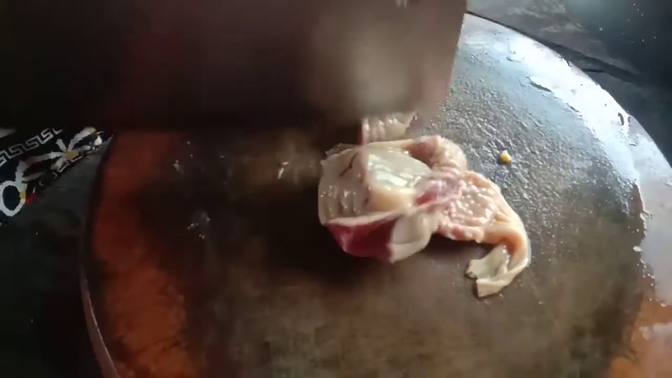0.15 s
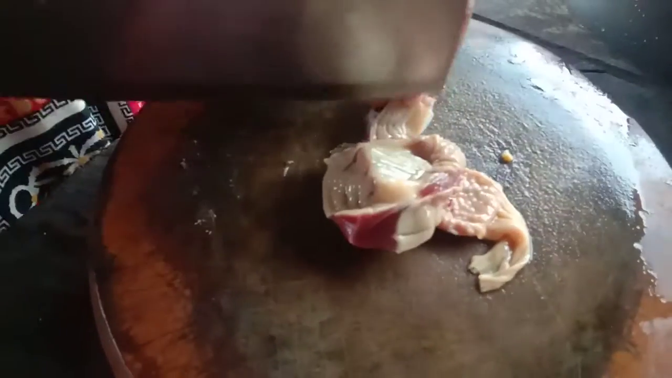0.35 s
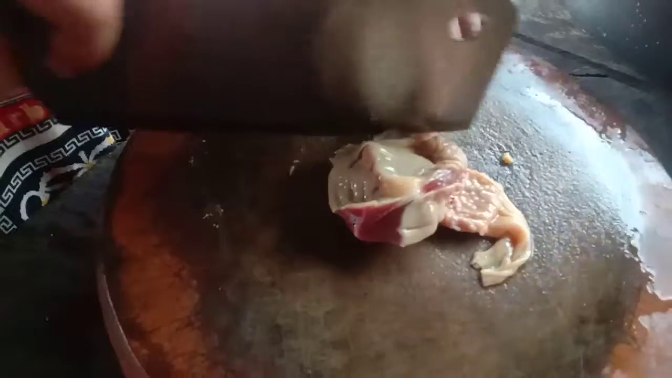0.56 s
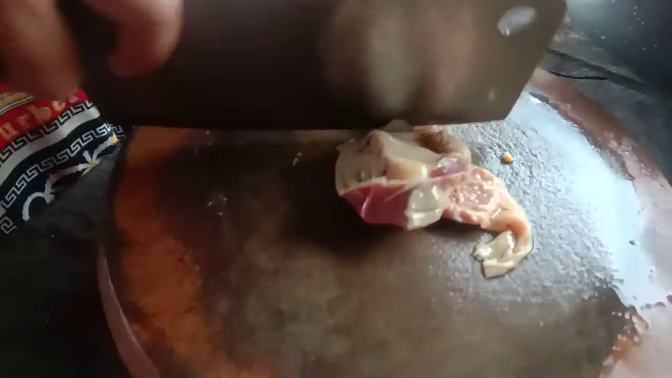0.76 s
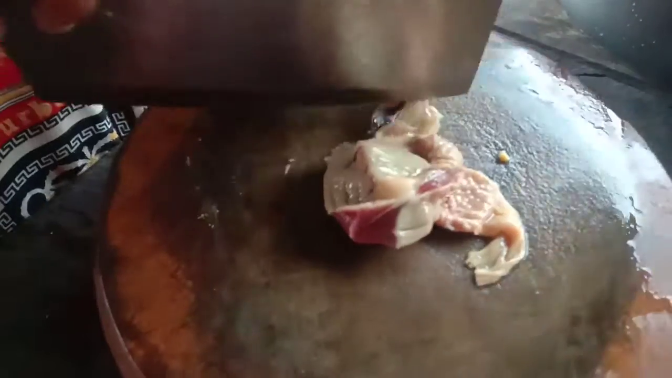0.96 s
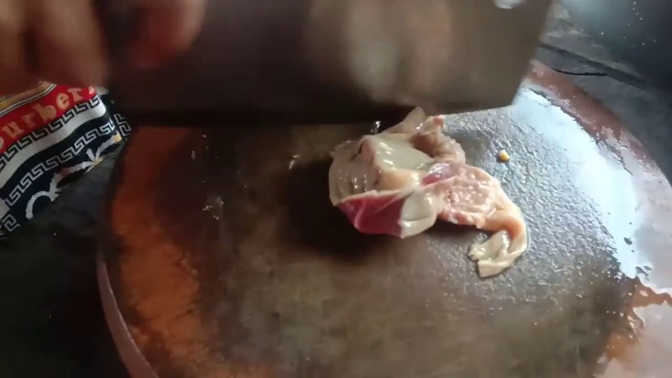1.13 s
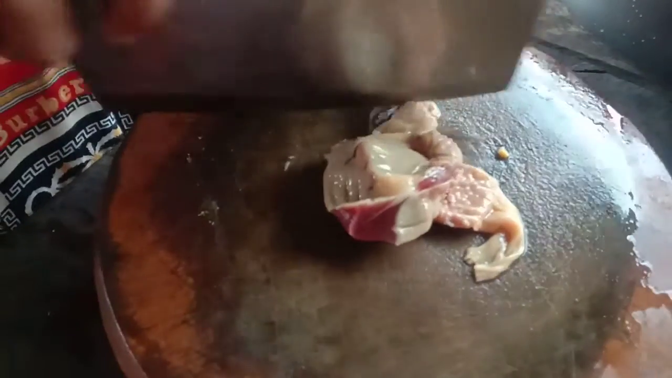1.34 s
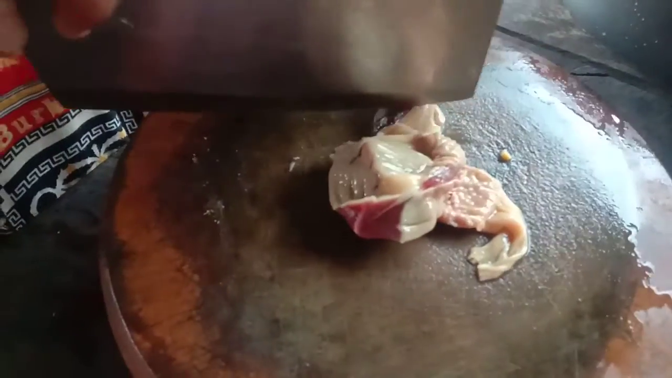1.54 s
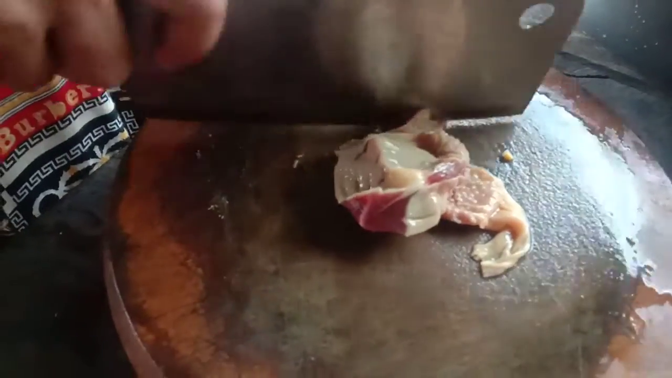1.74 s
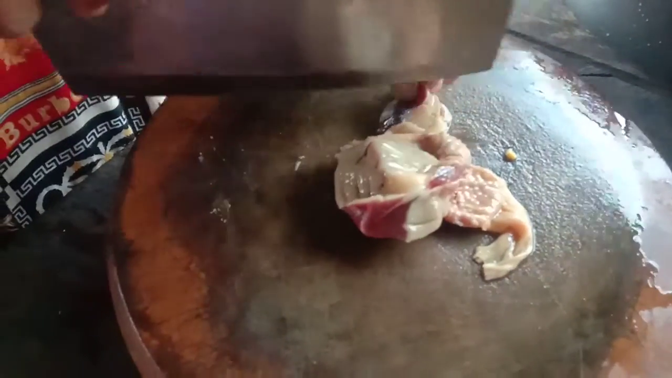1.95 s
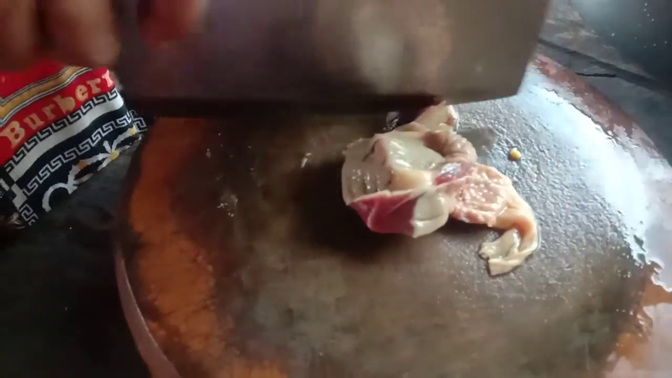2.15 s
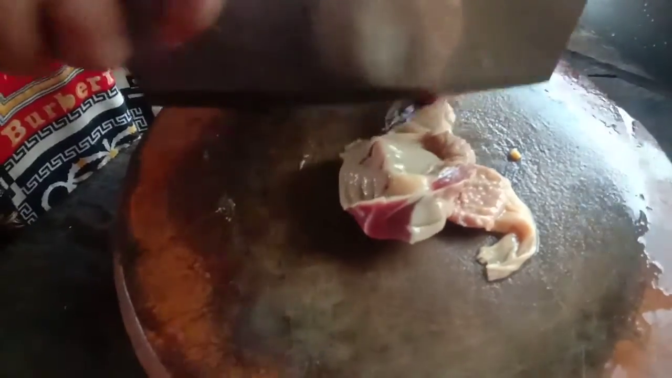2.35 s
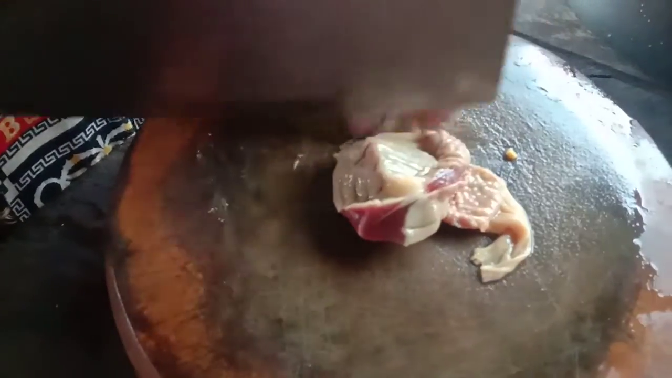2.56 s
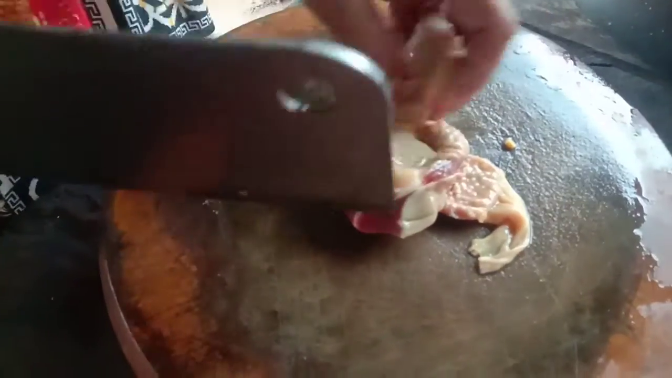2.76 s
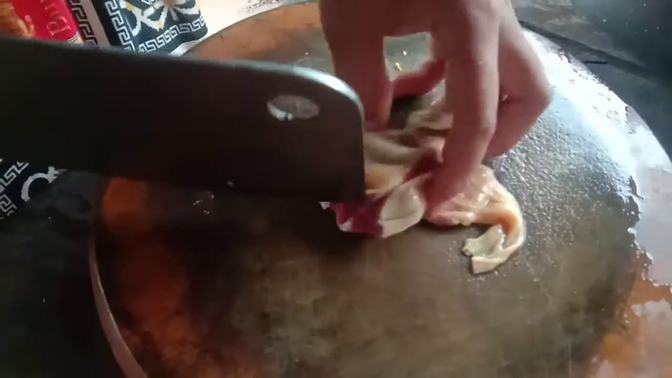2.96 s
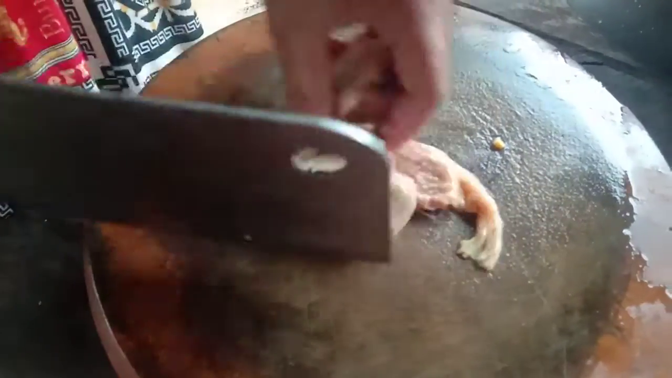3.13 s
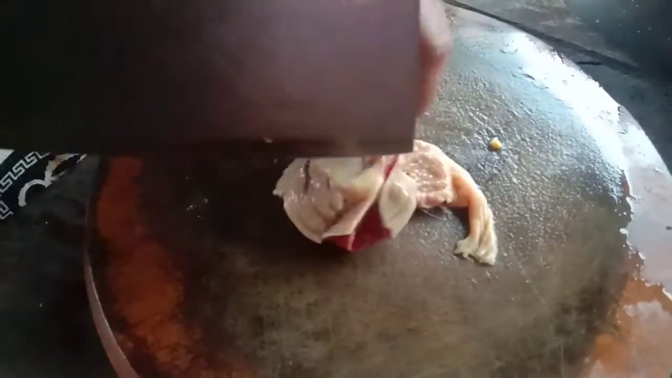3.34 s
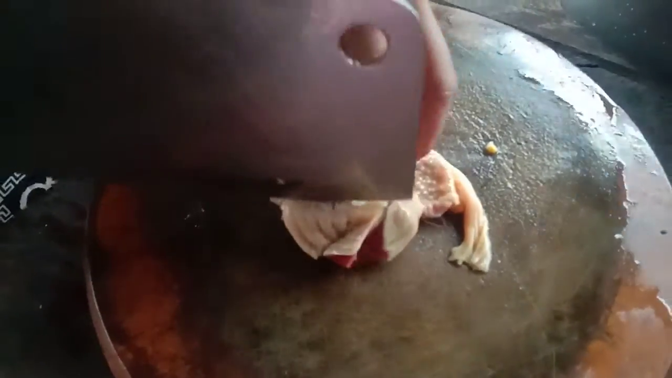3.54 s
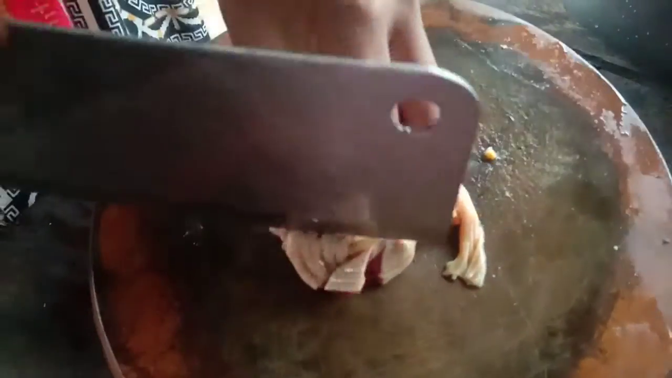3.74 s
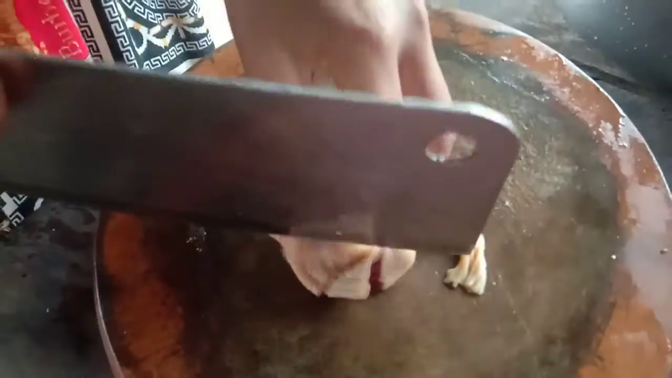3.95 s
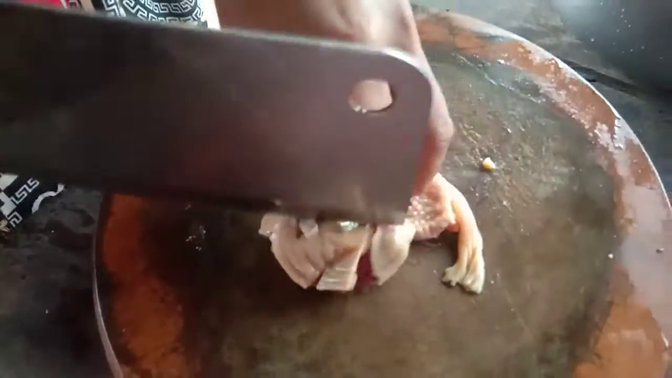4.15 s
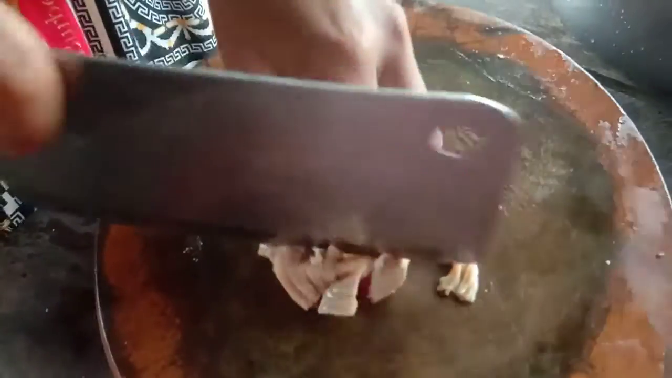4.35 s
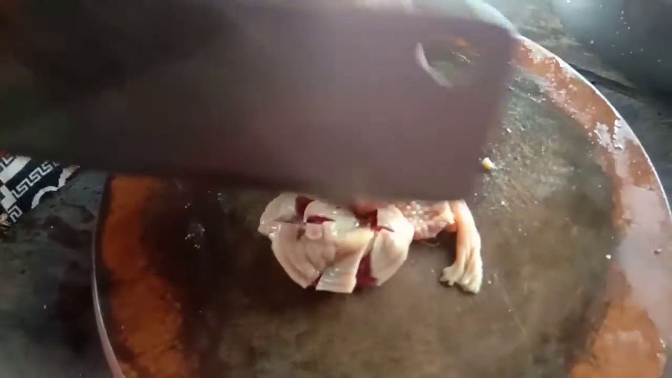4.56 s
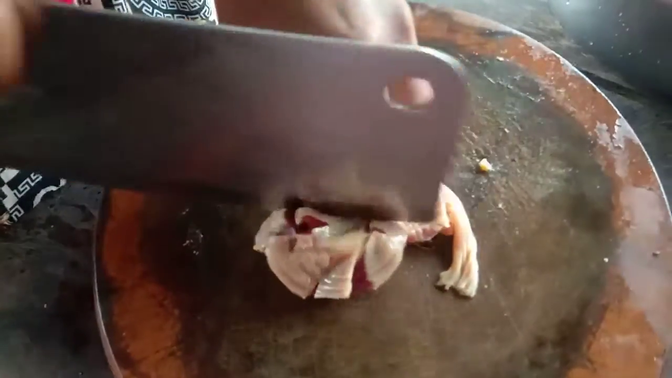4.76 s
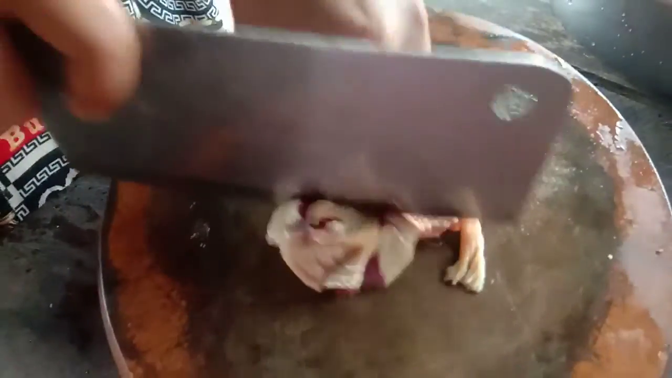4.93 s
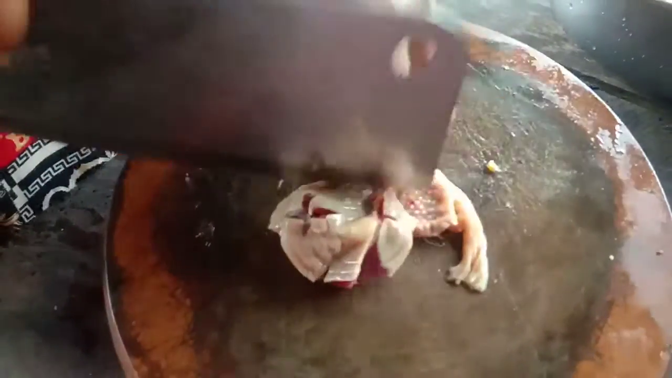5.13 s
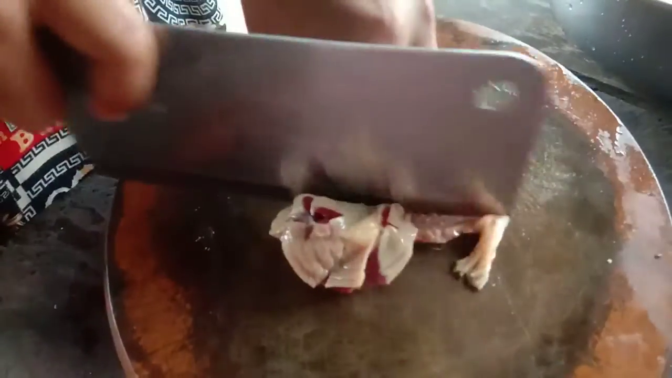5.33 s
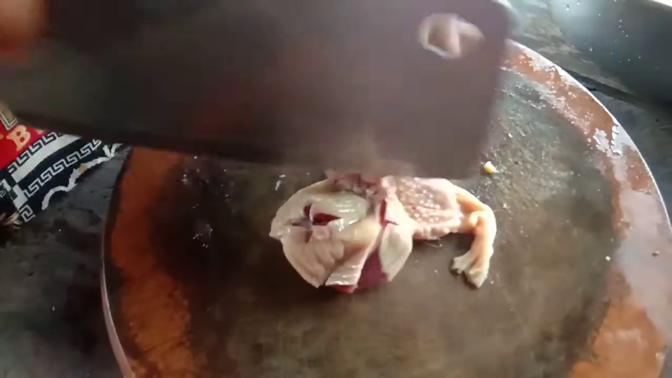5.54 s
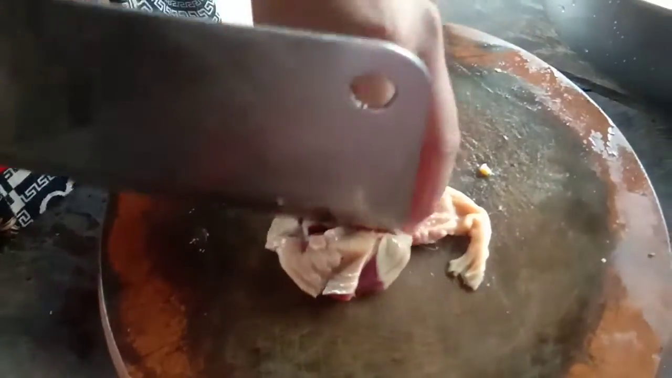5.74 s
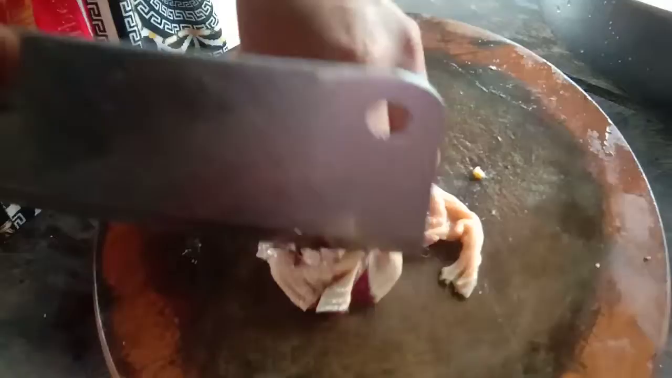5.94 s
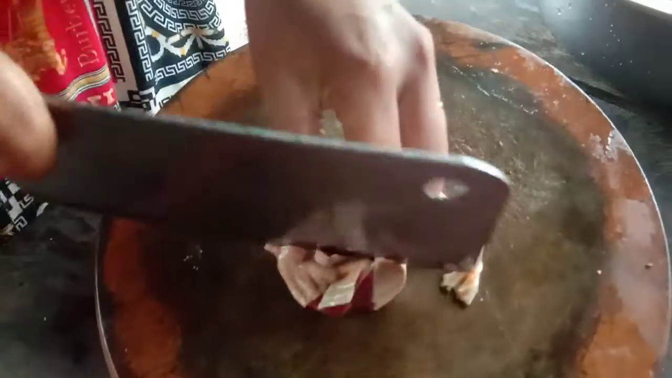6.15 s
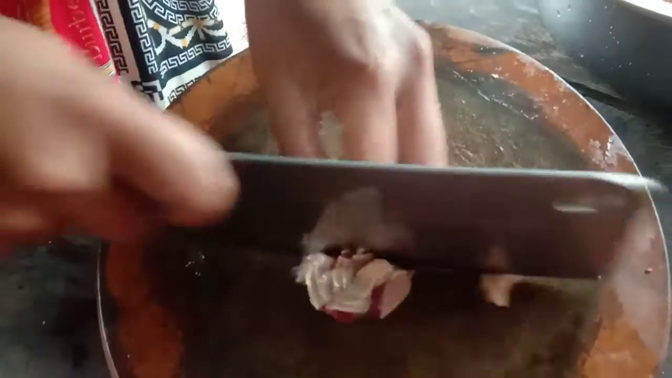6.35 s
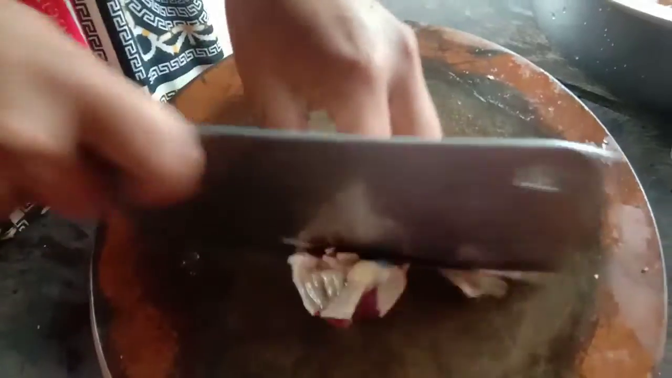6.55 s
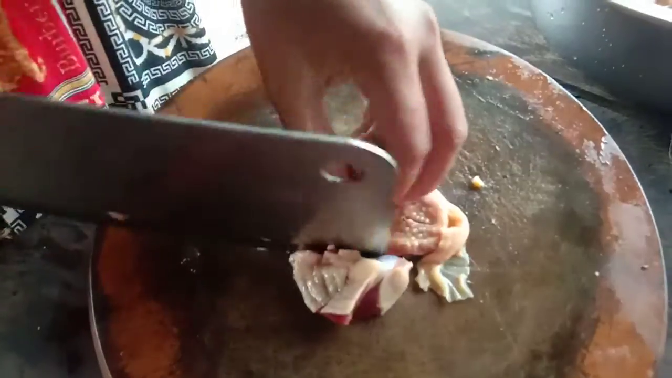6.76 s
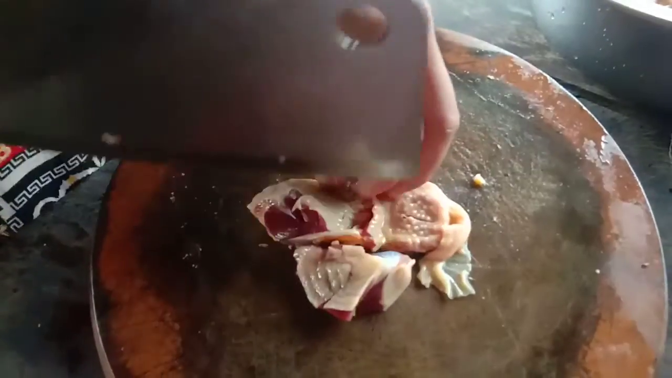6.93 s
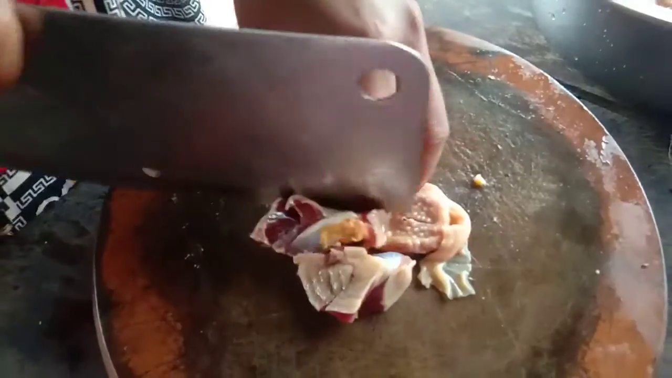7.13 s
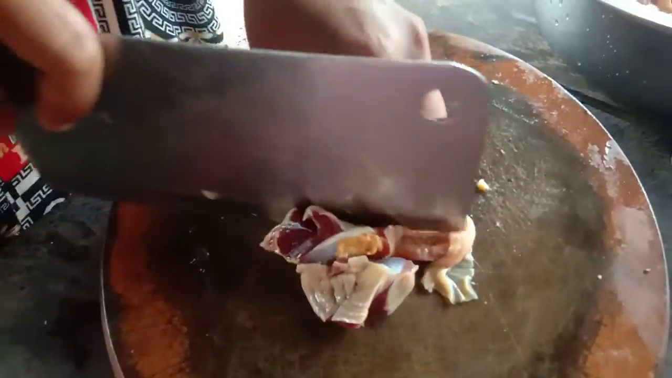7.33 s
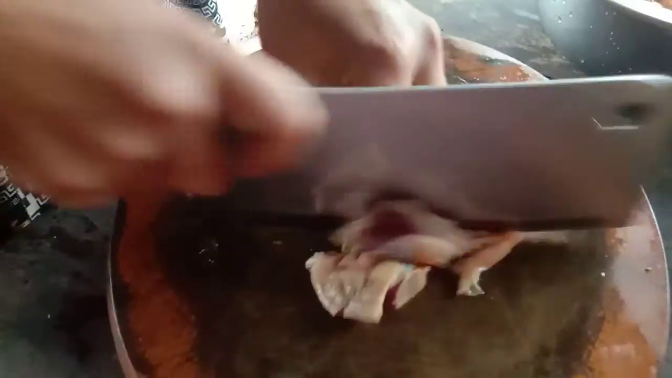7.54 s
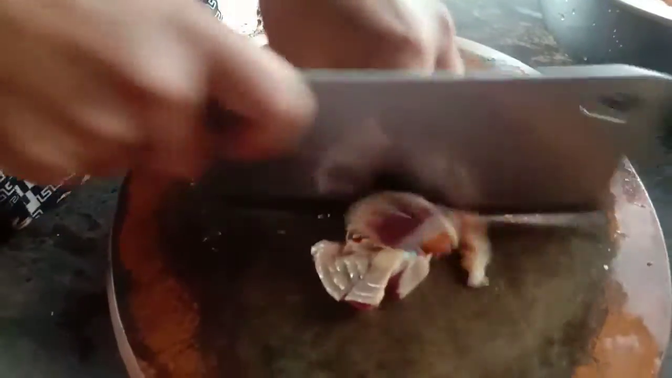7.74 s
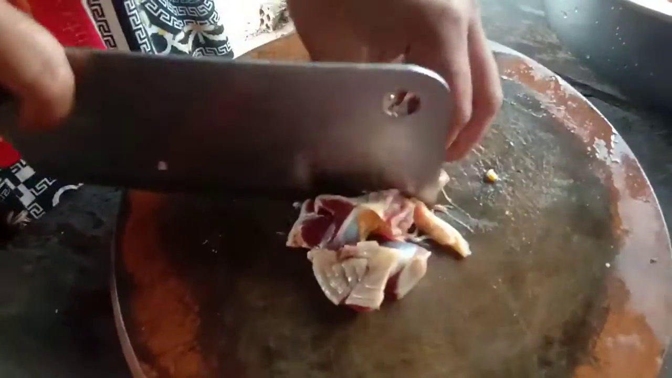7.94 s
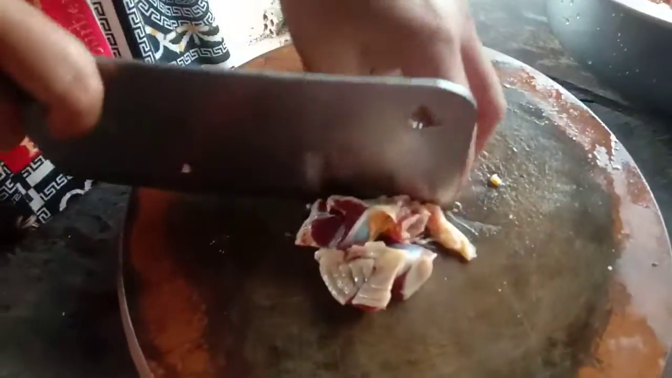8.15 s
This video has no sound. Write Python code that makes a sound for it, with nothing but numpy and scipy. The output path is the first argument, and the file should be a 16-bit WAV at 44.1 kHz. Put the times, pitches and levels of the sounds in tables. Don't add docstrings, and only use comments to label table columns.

```python
import sys
import numpy as np
from scipy import signal
from scipy.fft import rfft, irfft
from scipy.io import wavfile
from scipy.ndimage import uniform_filter1d

SR = 44100
rng = np.random.default_rng(int(sys.argv[2]) if len(sys.argv) > 2 else 0)


def undo_db(level):
    steps = np.asarray(level, float) / 20
    return 10 ** steps


def transcribe(u):
    v = np.clip(np.atleast_2d(u).T, -1, 1)
    q = np.round(v * 32767).astype(np.int16)
    wavfile.write(sys.argv[1], SR, q)


N = 361179
TIME = np.arange(N) / SR
TOP_HZ = 15800
LINE_WOBBLE, LINE_LOST_DB = 0.006, 14


def level(x, db):
    return x * undo_db(db) / np.sqrt(np.mean(x ** 2))


def curve(table):
    s, *columns = np.transpose(table)
    return [np.interp(TIME, s, c, left=c[0], right=c[-1]) for c in columns]


def colour(x, spectrum):
    hz, db = np.transpose(spectrum)
    grid = np.log(np.arange(N // 2 + 1) * SR / N + 1)
    gain_db = np.interp(grid, np.log(hz), db, left=-90, right=-90)
    return irfft(rfft(x) * undo_db(gain_db), N)


def ring(x, hz, width):
    return signal.lfilter(*signal.iirpeak(min(hz, 0.45 * SR), hz / max(width, 1), fs=SR), x)


def body(x, modes):
    return sum((-1) ** k * undo_db(db) * ring(x, hz, width) for k, (hz, width, db) in enumerate(modes))


def band(x, low, high):
    return signal.sosfilt(signal.butter(4, [low, high], "band", fs=SR, output="sos"), x)


def walk(count):
    k = int(SR / count)
    steps = np.repeat(rng.standard_normal(N // k + 1), k)
    return 1.265 * uniform_filter1d(uniform_filter1d(steps, k), k)[:N]


def add(out, start_s, x):
    i = int(start_s * SR)
    out[i:i + len(x)] += x[:N - i]


def chorus():
    # frequency in Hz, density in dB per Hz
    chorus_colour = [(2940, -31.5), (4850, -11), (5360, -12.5), (5870, -6.5), (6240, 5), (6720, 7),
                     (7040, 7.5), (7600, -3.5), (8060, -64), (8460, -67), (9000, -34), (11700, -35),
                     (19800, -120)]
    # time in seconds, chorus level in dB
    chorus_swell = [(0.0, -52), (0.27, -52.5), (2.23, -50.5), (2.46, -52.5), (2.96, -51.5), (6.25, -52),
                    (6.45, -51.5), (6.8, -52.5), (7.05, -51), (7.53, -49), (7.85, -53.5), (8.19, -50.5)]
    # time in seconds, gain of the lower kind in dB
    lower_swell = [(0, -2.5), (.5, -2), (1, -1), (1.5, 6.5), (2.3, -1), (2.8, -5), (3.3, -6), (3.8, 1),
                   (4.4, 3), (5, 4), (5.6, 1.5), (6.4, 6), (7, 3.5), (7.3, 3), (7.9, -2.5), (8.19, 0)]
    buzz = colour(undo_db(walk(300)) * rng.standard_normal(N), chorus_colour)
    buzz = level(buzz, -50.47)
    lower = colour(buzz, [(2500, 0), (5690, 0), (5710, -90)])
    (lower_db,) = curve(lower_swell)
    patchy = sum(undo_db(lower_db + 5.7 * walk(4.5)) * band(lower, hz, hz + 400) for hz in range(2500, 5700, 400))
    (swell_db,) = curve(chorus_swell)
    return undo_db(swell_db - swell_db.mean() + 1.1 * walk(5.8)) * (buzz - lower) + patchy


def engine():
    # time in seconds, firing rate in Hz
    firing_rate = [(0, 19.15), (.79, 19.6), (1.41, 19.6), (1.82, 19.9), (2.18, 19.9), (3.45, 20.6),
                   (4.06, 20.6), (4.65, 20.4), (4.94, 21.1), (5.27, 20.2), (5.51, 20.3), (5.8, 19.3),
                   (6.3, 18.7), (6.9, 18.1), (7.3, 17.7), (8.19, 17.2)]
    # time in seconds, exhaust level in dB
    exhaust_level = [(0.0, -56), (0.34, -53.5), (0.66, -57), (1.76, -52), (2.92, -50.5), (3.58, -58),
                     (4.22, -60.5), (5.68, -54), (5.93, -58), (6.87, -57.5), (7.25, -65.5), (7.53, -64.5),
                     (7.82, -64), (8.19, -60.5)]
    # centre in Hz, width in Hz, gain in dB
    exhaust_modes = [(81, 14, -8.5), (97, 29.2, 3), (116.7, 31.5, 6), (139.8, 9, 1.5), (245, 24, -23)]
    # time in seconds, level in dB
    casing_level = [(0, -85), (.65, -69), (.95, -80.5), (2.8, -79.5), (3.15, -65.5), (3.95, -66),
                    (4.3, -71.5), (4.8, -76), (4.95, -67), (5.1, -80), (5.3, -65.5), (5.5, -76.5),
                    (5.75, -63.5), (5.95, -86), (8.19, -81)]
    (hz,), (exhaust_db,), (casing_db,) = curve(firing_rate), curve(exhaust_level), curve(casing_level)
    slowed_hz = np.maximum(19.4 - hz, 0)
    uneven = 0.24 + 0.22 * slowed_hz
    cycle = np.floor(np.cumsum(hz * (1 + 0.037 * uneven * walk(21))) / SR + 0.49).astype(int)
    size_db = 6 * uneven * rng.standard_normal(N // 1000)[cycle]
    firing = np.diff(cycle, prepend=cycle[0]) * undo_db(size_db)
    exhaust = band(body(firing, exhaust_modes), 70, 280) * undo_db(-9.0 * slowed_hz)
    knock = level(band(firing, 170, 318), -28.5)
    hum = ring(ring(firing, 326.0, 21), 328, 35)
    hum_db = casing_db + 0.83 * walk(3.23)
    thump = band(ring(firing + 0.008 * rng.standard_normal(N), 90, 45), 62, 150)
    thump_db = -8.5 + 11 * np.clip(19.97 - hz, 0, 1.2) * (TIME > 5.0)
    puffs = level(exhaust, 0.88) + knock + level(thump, 0) * undo_db(thump_db)
    return undo_db(exhaust_db) * puffs + undo_db(hum_db) * level(hum, 0)


def yard():
    # frequency in Hz, density in dB per Hz
    rustle_colour = [(88, 1), (150, 0.5), (194, -9), (287, -9), (540, -19.5), (1080, -19.5), (1260, -16.5),
                     (1400, -21.5), (1620, -18), (2590, -16), (3660, -17.5), (5500, -37), (7150, -68),
                     (12100, -120)]
    top_colour = [(4710, -27), (8000, -2), (8090, -13), (8840, -28), (10500, -2.5), (11900, -19.5),
                  (13500, -16), (15300, -9), (16000, -11), (16200, -21)]
    low = colour(rng.standard_normal(N), rustle_colour)
    low = low * undo_db(-71) / np.std(band(low, 610, 3100))
    swell = walk(2.085)
    edges_hz = 140 * 1.4 ** np.arange(13)
    low = sum(undo_db(swell + 2.74 * walk(5) + 2.7 * walk(25)) * band(low, a, b)
              for a, b in zip(edges_hz, edges_hz[1:]))
    top = colour(undo_db(0.48 * walk(3.5)) * rng.standard_normal(N), top_colour)
    hollow = ring(ring(rng.standard_normal(N), 1250, 100), 1248, 110)
    return low + level(top, -74) + undo_db(5.6 * walk(9)) * level(hollow, -75.0)


def rumble():
    return level(band(rng.standard_normal(N), 15, 48) * undo_db(3.4 * walk(3)), -80.5)


def ticks():
    # start in seconds, peak in dB, ring in Hz, bare crack in dB
    edge_ticks = [(0.022, -45, 6300, -32), (0.1457, -55, 6550, -30), (0.713, -50, 6760, -21),
                  (1.1832, -28, 6000, -39), (1.202, -43, 1200, -45), (1.5683, -36, 6930, -15),
                  (1.576, -36, 14800, -17), (1.583, -21.5, 6160, -23), (1.586, -30, 1320, -29),
                  (1.716, -26.5, 6140, -30), (1.7182, -25, 6300, -36), (1.721, -31, 5000, -38),
                  (2.5094, -34, 6040, -22), (2.528, -30, 2400, -42), (2.9438, -45, 2050, -45),
                  (4.2368, -30, 6000, -23), (4.7604, -27, 5800, -34), (4.7903, -24, 6000, -32),
                  (4.889, -42, 15000, -14), (4.8934, -36.5, 1860, -26), (4.9192, -35, 6900, -38),
                  (5.1202, -33, 6600, -38), (5.125, -32, 5540, -40), (6.116, -39, 6000, -25),
                  (6.202, -36, 11500, -20), (6.295, -25, 6000, -26), (6.299, -29.5, 12100, -14),
                  (6.396, -33, 5570, -35), (6.4874, -20, 5670, -30), (6.555, -19, 6000, -34),
                  (6.8064, -40, 2750, -34), (6.9636, -46, 3500, -18), (7.375, -51, 11130, -10),
                  (7.425, -43, 11000, -10), (7.4343, -30, 4520, -34), (7.4713, -14.5, 6800, -11),
                  (7.4745, -11.5, 6200, -16), (7.6385, -28, 5500, -39), (7.766, -37, 2970, -40),
                  (7.99, -38, 1240, -42), (8.1555, -36, 6860, -30), (7.4745, -30, 15000, -25),
                  (7.462, -25, 5500, -25), (1.717, -37.5, 2050, -40), (6.5575, -20, 6500, -31),
                  (1.26, -36, 5750, -30), (6.1215, -38, 4800, -40), (1.728, -45, 9500, -25)]
    # start in seconds, peak in dB
    thuds = [
        (1.582, -39.5),
        (2.511, -45),
        (2.53, -48),
        (6.271, -50),
        (6.299, -46),
        (6.489, -56),
        (7.441, -64),
    ]
    # centre in Hz, width in Hz, gain in dB
    board_modes = [(97.6, 10.8, 4.5), (253, 150, -7), (490, 560, -15), (904, 53, -10)]
    # start in seconds, peak in dB, pitch in Hz
    knocks = [(5.575, -71, 625), (5.945, -68, 847), (6.02, -72, 700), (6.06, -68, 696), (6.618, -61, 433),
              (7.177, -72, 495)]
    out, push, t = np.zeros(N), np.zeros(N), TIME[:4000]
    shape = (1 - np.exp(-t / 0.0002)) * np.exp(-t / 0.0016)
    for s, db, hz, bare_db in edge_ticks:
        crack = band(rng.standard_normal(len(t)), 1060, 15700) * shape
        rung = band(ring(crack, hz, 0.35 * hz), 0.6 * hz, min(1.5 * hz, TOP_HZ))
        crack = rung + undo_db(bare_db + 3) * crack
        add(out, s, undo_db(db) * crack / np.abs(crack).max())
    for s, db in thuds:
        add(push, s, undo_db(db + 23.0) * np.exp(-t / 0.0009))
    for s, db, hz in knocks:
        swell = t / 0.0031 * np.exp(1 - t / 0.014) / 1.35
        tone = np.sin(2 * np.pi * hz * t) * np.cos(2 * np.pi * 22 * t)
        add(out, s, undo_db(db) * swell * tone)
    return out + body(push, board_modes)


def touches(table, voice, rounded):
    power = np.zeros((len(voice) + 1, N))
    offset_db, share, lost_db = np.transpose(voice)
    for s, db, rise_s, fall_s, extra_db in table:
        span = slice(max(int((s - 2 * rise_s) * SR), 0), int((s + 2 * fall_s) * SR))
        late = TIME[span] - s
        away = np.where(late < 0, -late / rise_s, late / fall_s) ** rounded
        bands_db = (db + offset_db + share * extra_db)[:, None] - lost_db[:, None] * away
        board_db = 1.26 * ((bands_db[0] + bands_db[1]) / 2 + 41.5) - 48.5
        power[:, span] += undo_db(2 * np.vstack([board_db, bands_db]))
    return power


def slicing():
    # low edge in Hz, high edge in Hz
    slice_bands = [(250, 1030), (1030, 1470), (1470, 4300), (4300, 8300), (8300, 16000)]
    # frequency in Hz, density in dB per Hz
    slice_colour = [(120, -64), (200, -41), (500, -18), (722, -18.5), (1230, -9.5), (1770, -9.5),
                    (2860, -11.5), (3620, -13), (5940, -3.5), (8900, -27), (13000, -31), (14600, -29),
                    (16000, -20)]
    # centre in Hz, width in Hz, gain in dB
    blade_modes = [(467, 44, -1.5), (630, 300, -13.5), (1240, 33, 14), (1596, 11, -10), (2050, 190, -18),
                   (2700, 91, 1), (2930, 62, -8.5), (3320, 410, -4.5), (4084, 230, -4.5), (4920, 180, -6),
                   (5500, 150, 0), (5900, 340, -6), (6140, 720, -0.5), (6760, 340, 4.5), (7280, 170, 2.5),
                   (10800, 57, -7),
                   (7830, 65, 3), (8400, 63, -3.5), (8940, 62, 0), (9610, 130, 0.5), (10445, 125, -0.5),
                 (11000, 49, 3), (11230, 81, 1), (11900, 40, -2), (12000, 87, 0), (13300, 55, -3),
                 (13350, 120, -4), (14000, 100, -3), (14400, 85, -1), (15050, 104, 3)]
    # peak in seconds, edge hiss in dB, rise in seconds, fall in seconds, weight on the blade in dB
    draws = [(0.535, -51, 0.09, 0.1, -4.5), (1.03, -48.5, 0.055, 0.071, -10),
             (1.095, -50, 0.097, 0.078, -3), (1.583, -49.5, 0.07, 0.093, -5.5),
             (2.07, -47, 0.015, 0.2, -2.5), (4.255, -55.5, 0.12, 0.12, 3.5),
             (4.762, -42.5, 0.098, 0.094, -6), (5.285, -56, 0.13, 0.077, 0.5), (6.12, -67, 0.49, 0.21, 0),
             (6.203, -42, 0.012, 0.17, -7.5), (6.275, -37.5, 0.018, 0.015, -6), (6.31, -46, 0.086, 0.11, 1),
             (6.462, -50, 0.012, 0.049, -1), (6.489, -38, 0.014, 0.045, -1),
             (6.55, -39.5, 0.084, 0.14, 0.5), (6.62, -48, 0.11, 0.12, 3.5), (7.38, -56, 0.23, 0.3, 2),
             (7.437, -46.5, 0.008, .09, 0), (7.475, -42, 0.039, 0.037, 4), (7.5, -51, 0.062, 0.1, 7),
             (7.648, -52.5, 0.025, 0.035, 7), (7.79, -64, 0.22, 0.11, 10)]
    # peak in seconds, blade in dB, rise in seconds, fall in seconds, ring of the lowest mode in dB
    presses = [(0.8, -67, 0.094, 0.047, 4), (1.208, -52, 0.018, 0.02, 5), (1.265, -44.5, 0.12, 0.19, -6.5),
               (1.45, -55, 0.17, 0.053, -4), (1.716, -46.5, 0.0062, 0.067, -26),
               (2.512, -35, 0.0041, 0.087, -8), (2.545, -44.5, 0.032, 0.15, 1),
               (2.95, -55.5, 0.026, 0.087, -18), (3.17, -63, 0.55, 0.14, -1),
               (3.44, -56.5, 0.063, .1, -3.5), (3.81, -60, 0.48, 0.2, -12), (5.803, -53, 0.012, 0.34, -6),
               (6.345, -44.5, 0.071, 0.056, 2.5), (6.458, -41, 0.006, 0.019, -4), (6.87, -71, .05, .08, -4),
               (6.81, -50.5, 0.01, 0.22, -12), (6.99, -56, 0.057, 0.1, -19), (7.437, -57, 0.0036, .05, -5),
               (7.993, -51, 0.066, 0.03, -2)]
    # offset in dB, share of the touch's last column, dB lost over rise and fall
    draw_voice = [(-3.5, 1.1, 19.5), (1.5, 1.04, 22.5), (7, 0.9, 20.5), (2.5, 0.31, 24.5)]
    press_voice = [(1, 1.2, 26), (0, 0.11, 23.6), (0.5, 0.11, 58), (-14.5, 0.13, 92)]
    sizes_db = 3.8 * np.minimum(rng.exponential(size=N), 4)
    snaps = (rng.random(N) < 2500 / SR) * undo_db(sizes_db) * rng.choice([-1, 1], N)
    friction = undo_db(1.13 * walk(90)) * (level(snaps, -7.0) + level(rng.standard_normal(N), -0.67))
    modes = sum(ring(friction * undo_db(db + 6 * walk(28)), hz, width) for hz, width, db in blade_modes)
    sound = colour(friction + undo_db(9) * modes, slice_colour)
    gains = np.sqrt(touches(draws, draw_voice, 1.54) + touches(presses, press_voice, 1.06))
    out = []
    for gain, edges_hz in zip(gains, slice_bands):
        part = band(sound, *edges_hz)
        out.append(gain * part / np.sqrt(uniform_filter1d(part ** 2, size=2000) + 1e-12))
    return out


def bitten(slices):
    catch_db = [1.5, 2.5, 2, 1.5, 1.5]
    bite = walk(160)
    return sum(part * undo_db(db * (walk(110) + bite) / 1.4 - db / 4) for part, db in zip(slices, catch_db))


def squeals():
    # peak in seconds, first pitch in Hz, last pitch in Hz, level in dB, half length in seconds
    slides = [(.54, 5650, 6250, -41, .035), (0.502, 4150, 4100, -58, 0.033), (.53, 1330, 1360, -53, 0.022),
              (6.14, 3600, 3900, -56, .09), (5.85, 2300, 2800, -61, .05), (6.55, 5500, 6150, -32, 0.038),
              (6.6, 4000, 4900, -40, .04), (6.51, 2200, 2400, -50, 0.034), (6.215, 2730, 3000, -51, .025)]
    out, wobble, flutter = np.zeros(N), walk(300), undo_db(4 * walk(150))
    for s, first_hz, last_hz, db, half_s in slides:
        span = slice(int((s - 2 * half_s) * SR), int((s + 2 * half_s) * SR))
        away = (TIME[span] - s) / half_s
        hz = first_hz + (last_hz - first_hz) * np.clip((1 + away) / 2, 0, 1)
        phase = 2 * np.pi * np.cumsum(hz * (1 + 3 * LINE_WOBBLE * wobble[span])) / SR
        out[span] += undo_db(db - LINE_LOST_DB * away ** 2) * flutter[span] * np.sin(phase)
    return out


def singing():
    # peak in seconds, pitch in Hz, level in dB, rise in seconds, fall in seconds
    sung_modes = [(.545, 1320, -55, .04, 0.05), (.54, 6140, -51, 0.035, .03), (1.11, 1320, -55, .08, .05),
                  (1.595, 1333, -44, 0.0065, 0.016), (2.52, 2507, -40, 0.0089, 0.03),
                  (2.52, 6050, -40.5, 0.0084, 0.024), (2.55, 1220, -52, 0.015, 0.087),
                  (4.27, 3060, -51, 0.026, .03), (4.31, 3540, -53, .02, 0.038),
                  (4.22, 2760, -58, 0.039, .03), (4.76, 2700, -51, 0.017, 0.027),
                  (6.21, 5600, -46, .015, .03), (6.275, 6400, -39, .015, 0.016),
                  (6.295, 5900, -47, 0.009, 0.013), (6.33, 1222, -40, 0.026, 0.07),
                  (6.33, 5530, -43, .03, .04), (6.345, 2600, -45, 0.032, 0.042),
                  (6.455, 1233, -37, 0.0056, 0.013), (6.465, 5540, -40, .01, .015),
                  (6.465, 2720, -48, 0.0086, 0.016), (6.49, 5540, -32, .012, .03),
                  (6.5, 1190, -40.5, 0.019, 0.036), (6.53, 5400, -35, .03, .025),
                  (6.53, 4010, -46, .02, .02), (6.56, 6030, -33, .04, 0.02),
                  (6.562, 6800, -35.5, 0.025, 0.037), (6.565, 2930, -37, 0.033, 0.043),
                  (6.6, 1960, -46, 0.035, 0.032), (6.62, 5390, -41, .03, .03), (6.65, 6800, -47, .03, .03),
                  (6.675, 6040, -42, .02, .03), (6.81, 2730, -48, 0.0048, 0.011),
                  (7.45, 4643, -41, 0.023, .03), (7.48, 1664, -44, 0.017, 0.041),
                  (7.51, 1144, -45.5, 0.025, 0.06), (7.645, 1160, -45.5, 0.011, 0.018),
                  (7.65, 4570, -37, 0.011, 0.01), (7.65, 5580, -40.5, 0.014, .015),
                  (7.77, 2850, -54, 0.013, 0.024), (7.992, 3530, -52, .01, 0.0088)]
    out, wobble, flutter_db = np.zeros(N), walk(250), 3 * walk(120)
    late = TIME[:13000] - 0.12
    for k, (s, hz, db, rise_s, fall_s) in enumerate(sung_modes):
        away = np.where(late < 0, late / rise_s, late / fall_s) ** 2
        chance = slice(8000 * k, 8000 * k + len(late))
        phase = 2 * np.pi * np.cumsum(hz * (1 + LINE_WOBBLE * wobble[chance])) / SR
        add(out, s - 0.12, undo_db(db - LINE_LOST_DB * away + flutter_db[chance]) * np.sin(phase))
    return out


def shoves():
    # peak in seconds, level in dB, half length in seconds, centre in Hz
    squelches = [(2.545, -49, 0.081, 1740), (2.63, -58.5, 0.073, 2500), (2.561, -62, 0.066, 430),
                 (4.24, -63, 0.04, 610), (6.25, -55, 0.05, 590), (6.55, -57, 0.057, 490),
                 (6.62, -63, 0.046, 2500), (6.83, -62, 0.096, 770), (6.86, -59, 0.056, 470),
                 (4.27, -50, 0.074, 3540), (4.893, -56, 0.008, 3600), (0.63, -70, 0.042, 2800),
                 (1.56, -63, .03, 2440), (6.861, -59.5, .07, 3300), (6.2, -58, 0.033, 2000),
                 (7.44, -62, 0.068, 330), (7.47, -53, 0.086, 930), (7.819, -57, 0.042, 1220),
                 (7.8, -53, .03, 5400), (1.275, -55, 0.056, 2060), (1.442, -59.5, 0.043, 1560),
                 (5.85, -58, 0.06, 2260), (6.349, -56, 0.037, 2300)]
    out, t = np.zeros(N), TIME[:18000] - 0.2
    lumps = undo_db(4.1 * walk(70))
    for k, (s, db, half_s, hz) in enumerate(squelches):
        wet = band(rng.standard_normal(len(t)), hz / 1.3, hz * 1.3)
        wet = wet * lumps[14000 * k:14000 * k + len(t)]
        swell = np.exp(-(t / np.where(t < 0, 0.4 * half_s, half_s)) ** 2)
        add(out, s - 0.2, level(wet, db) * swell)
    return out


def cicada():
    # start in seconds, level in dB
    phrases = [(1.694, -43.5), (1.925, -44), (2.154, -43.5), (2.384, -44.5), (2.613, -44.5), (2.876, -45),
               (3.104, -45), (3.374, -46), (5.847, -42.5), (6.08, -43), (6.303, -45), (6.56, -46)]
    syllables_db = [-4, -0.5, -2, -9.5, -44, -52]
    clicks_db = [-4, -3, 0]
    syllable_s = 0.0387
    gate, t = np.zeros(N), TIME[:700]
    buckle = (t / 0.0085) * np.exp(1 - (t / 0.0085) ** 4)
    for start_s, db in phrases:
        for k, syllable_db in enumerate(syllables_db):
            for j, click_db in enumerate(clicks_db):
                late, size = rng.standard_normal(2)
                when_s = start_s + syllable_s * (k + j / len(clicks_db)) + 0.00065 * late
                add(gate, when_s, undo_db(db + syllable_db + click_db + 0.8 * size) * buckle)
    phase = 2 * np.pi * np.cumsum(4730 * (1 + 0.036 * walk(600))) / SR
    ribs = np.sin(phase) * undo_db(0.9 * walk(250))
    call = undo_db(6.0) * ring(gate * ribs, 4700, 570)
    tail = rng.standard_normal(6000) * np.exp(-TIME[:6000] / 0.098)
    return call + undo_db(-37) * signal.fftconvolve(call, tail)[:N]


def roosters():
    # start in seconds, length in seconds, first pitch in Hz, held pitch in Hz, glide in seconds,
    # level in dB
    crows = [
        (3.282, 0.16, 1520, 1723, 0.082, -62.5),
        (3.568, 0.16, 1702, 1673, 0.12, -58.5),
        (3.68, 0.45, 1690, 1532, .14, -66.5),
        (4.29, .84, 1530, 1527, .2, -65),
        (5.45, .32, 1270, 1339, 0.124, -62),
        (5.819, 0.18, 1300, 1320, .1, -58),
        (5.949, 0.17, 1320, 1402, 0.064, -60.5),
    ]
    out = np.zeros(N)
    for start_s, length_s, first_hz, held_hz, glide_s, db in crows:
        hz = first_hz + (held_hz - first_hz) * np.clip((TIME - start_s) / glide_s, 0, 1)
        edge = np.clip(np.minimum(TIME - start_s, start_s + length_s - TIME) / 0.036, 0, 1)
        phase = 2 * np.pi * np.cumsum(hz * (1 + 0.015 * walk(120))) / SR
        out += edge ** 2 * undo_db(db + 3.1 * walk(35)) * np.sin(phase)
    tail = rng.standard_normal(9000) * np.exp(-TIME[:9000] / 0.11)
    return out + undo_db(-37.0) * signal.fftconvolve(out, tail)[:N]


def scene():
    # frequency in Hz, side level in dB
    side_colour = [(150, -26), (300, -21), (600, -20), (1000, -28), (2000, -27), (6000, -38), (9000, -36),
                   (12000, -27), (17000, -21)]
    mid = chorus() + engine() + yard() + rumble() + ticks() + bitten(slicing())
    mid = mid + squeals() + singing() + shoves() + cicada() + roosters()
    scatter = rng.standard_normal(1500)
    side = colour(signal.fftconvolve(mid, scatter / np.linalg.norm(scatter))[:N], side_colour)
    side = side + level(band(rng.standard_normal(N), 30, 180), -87)
    return np.array([mid + side, mid - side])


def low_pass(x):
    return signal.sosfilt(signal.butter(12, 15730, fs=SR, output="sos"), x)


def record(dry):
    cut = signal.sosfilt(signal.ellip(10, 0.2, 70, TOP_HZ, fs=SR, output="sos"), dry)
    return low_pass(cut)


dry = scene()
out = record(dry)
transcribe(out)
```